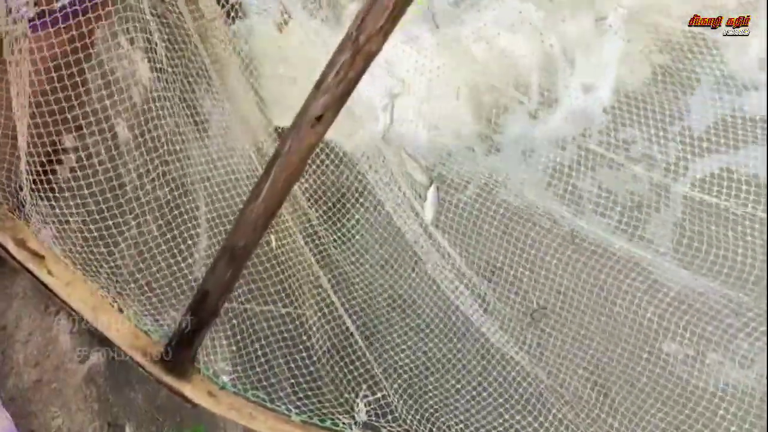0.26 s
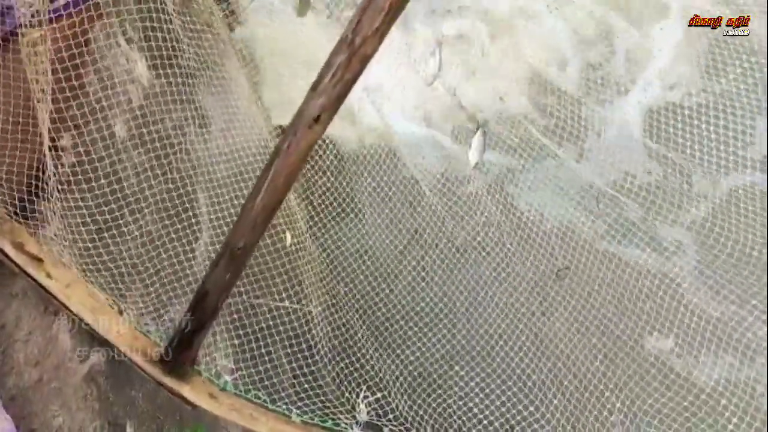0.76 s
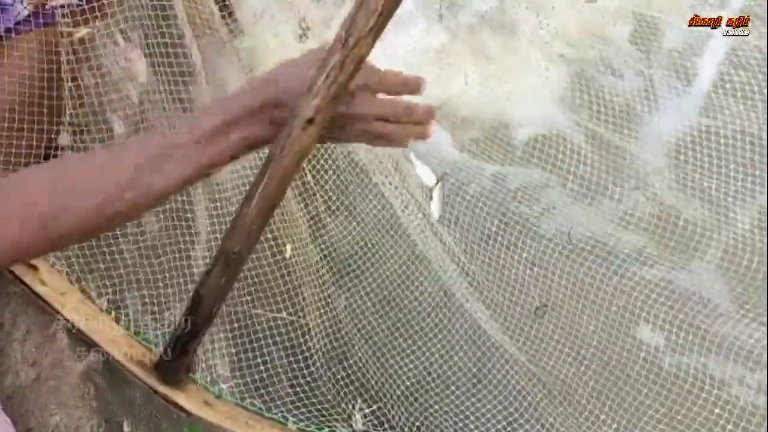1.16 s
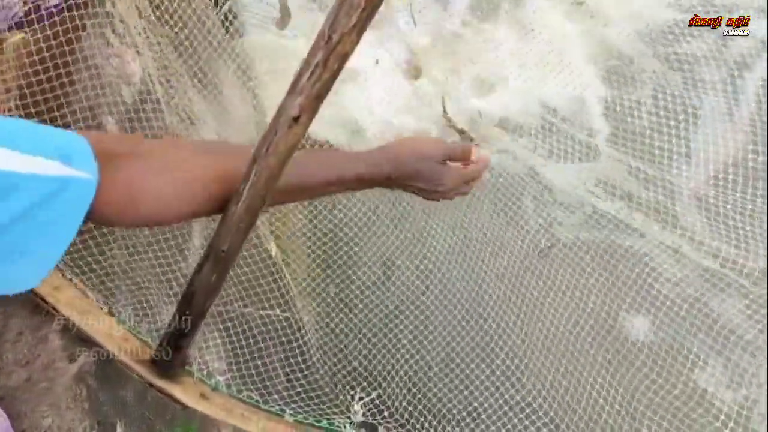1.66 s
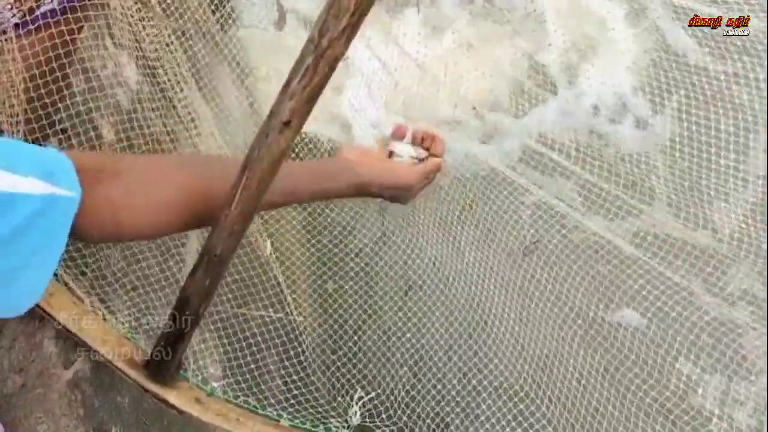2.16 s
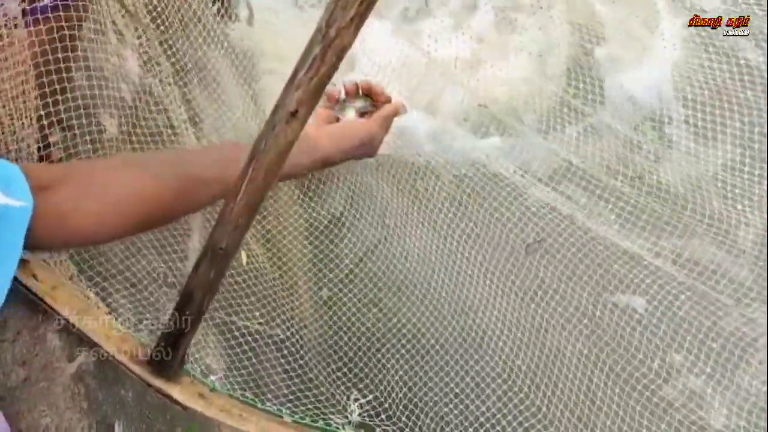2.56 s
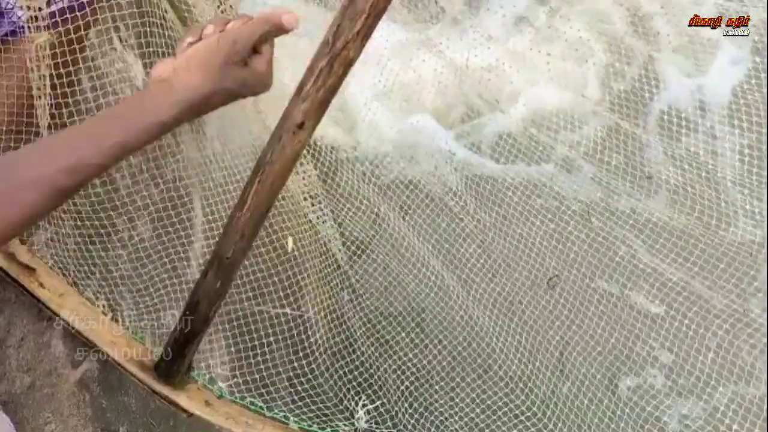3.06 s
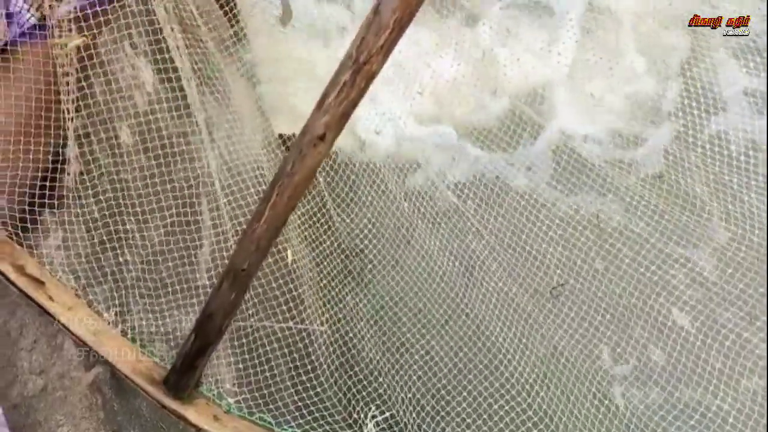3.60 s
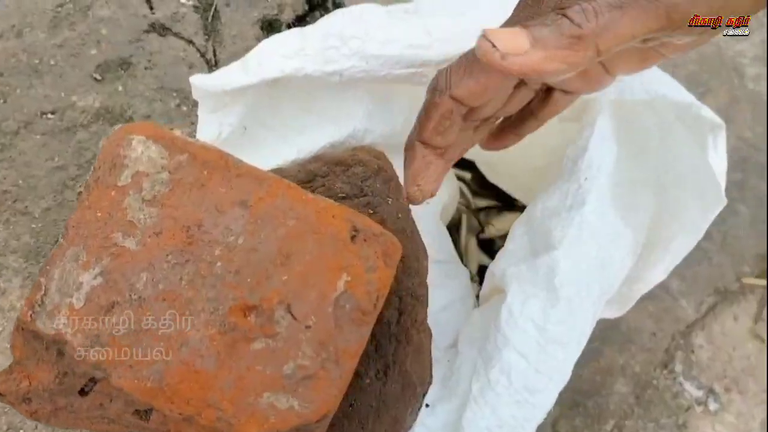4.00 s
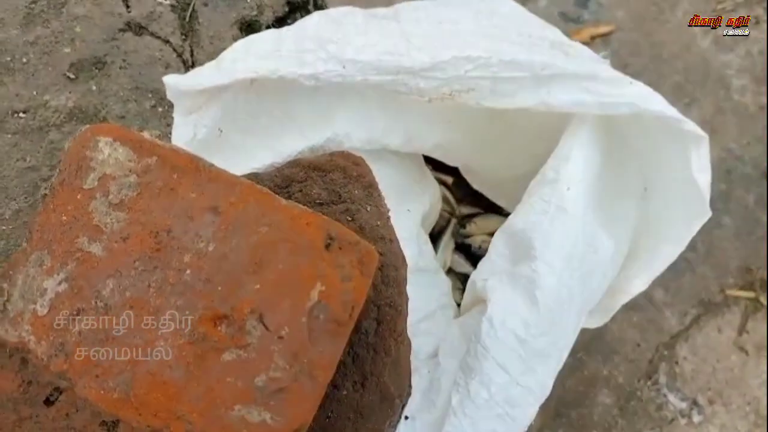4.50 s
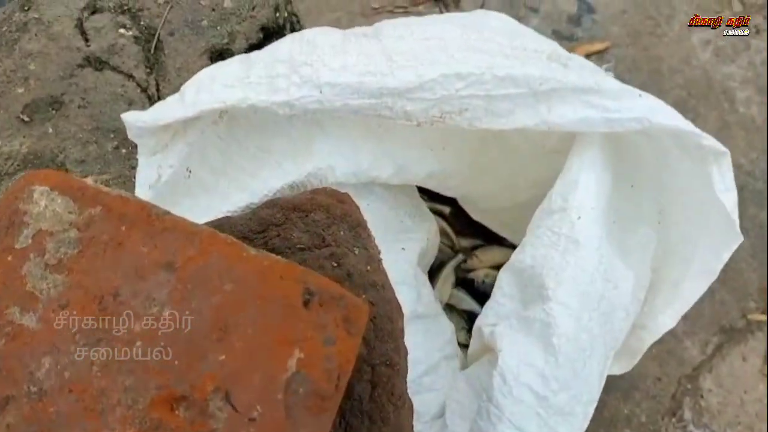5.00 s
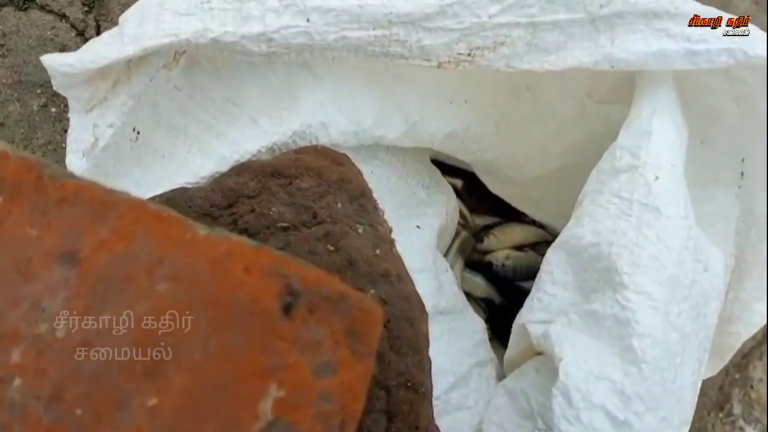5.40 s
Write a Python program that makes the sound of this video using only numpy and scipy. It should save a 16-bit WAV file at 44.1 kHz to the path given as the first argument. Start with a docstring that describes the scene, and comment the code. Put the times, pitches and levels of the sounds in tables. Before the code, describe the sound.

From the start, water gushes out of a sluice into a channel, close and outdoors: a steady foaming rush with fizzing spray on top and single bubbles plopping through it. A faint, thin whistle sounds at about 0.2 seconds and a drop ticks at 0.5. Wind bumps the microphone lightly around 0.8 seconds and rumbles again between 2.5 and 3.5. At 3.5 seconds everything cuts to silence. At about 4.1 the water returns as a smoother wash heard from the bank, then sinks noticeably over the next second as the microphone turns away. Between 4.3 and 4.9 it briefly sounds hollow, with two quick splashes and a few faint high whistled notes, perhaps a far bird. From 4.4 seconds until the end, near 5.6, gusts buffet the microphone with uneven low thumps over the softer water.

```python
"""A foaming rush, close by: water gushes from a sluice into a channel, full of bursting bubbles.
Each bubble rings as an air spring loaded by water; countless tiny bursts merge into noise.
After a short silence the microphone is on the bank and turns away, so the rush and its spray sink,
while eddies of wind buffet it with low thumps and the water briefly sounds hollow.
Twice a faint thin whistle rises over the water."""
import sys
import numpy as np
from scipy import signal
from scipy.fft import rfft, irfft
from scipy.io import wavfile
from scipy.ndimage import uniform_filter1d

SR = 44100
rng = np.random.default_rng(int(sys.argv[2]) if len(sys.argv) > 2 else 0)


def output_pcm(signal):
    """Save a mono or channel-first signal as 16-bit PCM at the path in sys.argv[1].

    Samples are clipped to [-1, 1] before scaling.
    """
    pcm = np.clip(np.atleast_2d(signal).T, -1, 1) * 32767
    wavfile.write(sys.argv[1], SR, np.round(pcm).astype(np.int16))


N = 249165
TIME = np.arange(N) / SR
PAUSE_START_S, BANK_START_S = 3.516, 4.134  # the silence between the outflow and the bank


def rush(surge_db=0.57, surge_hz=5, sink_db=8.5, splash_share=.25):
    """Turbulence traps air: foam and ringing bubbles add to a roar, a smoother wash from the bank."""
    # spectra beside the outflow and from the bank: f/Hz, relative level/dB
    near_spectrum = [(60, -30.5), (110, -3), (190, -3.5), (330, -4), (450, 0.5), (620, -2.5), (800, 0),
                     (1130, 1), (1600, -4.5), (1780, -4), (2060, -9.5), (2640, -6.5), (3220, -9.5),
                     (4000, -7), (5200, -47), (8800, -110)]
    bank_spectrum = [(60, -31), (100, -3), (150, 1), (250, 2.5), (320, -5), (450, 1), (560, -0.5),
                     (700, -6), (850, -2), (1100, -5.5), (1300, -9.5), (1800, -9.5), (2200, -15.5),
                     (2600, -10.5), (3300, -13.5), (4000, -10), (5200, -53), (8800, -110)]
    gurgle = swarm(216.3, 1892, per_s=500, spread_db=3.5, cycles=2.2)
    near = foam(patchy_db=1.5, flicker_db=0.7) + amp(-16) * gurgle
    bank = foam(patchy_db=0.95, flicker_db=1.0) + amp(-22) * gurgle
    near = amp(-30) * colour(near, near_spectrum)
    bank = amp(-28.2 - sink_db * turned()) * colour(bank, bank_spectrum)
    surge = amp(splash_share * splash_db() + surge_db * drift(surge_hz))
    return np.where(TIME < BANK_START_S, near, bank) * surge


def spray(surge_db=0.5, surge_hz=8, sink_db=9):
    """Resonant frequency rises as size falls: droplets and the smallest bubbles fizz above the rush."""
    # spectra beside the outflow and from the bank: f/Hz, relative level/dB
    near_spectrum = [(3000, -22.5), (3800, 0.5), (4150, 0.5), (4450, -2.5), (5000, -1.5), (5850, 0),
                     (6500, -6.5), (7200, -6), (8200, -17), (9200, -34), (11000, -30.5), (11900, -24),
                     (13000, -36.5), (15400, -25.5)]
    bank_spectrum = [(3000, -29), (3800, 4), (4200, -1), (4600, -2.5), (5850, -3.5), (6500, -6),
                     (7200, -4.5), (8200, -15.5), (9300, -35), (10200, -26.5), (11900, -26), (13000, -32),
                     (15400, -25)]
    fizz = foam(patchy_db=0.5, flicker_db=.8)
    fizz += amp(-11) * swarm(3500, 14000, per_s=700, spread_db=4.5, cycles=3.5, count=20)
    near = amp(-44.2) * colour(fizz, near_spectrum)
    bank = amp(-44 - sink_db * turned()) * colour(fizz, bank_spectrum)
    surge = amp(splash_db() + surge_db * drift(surge_hz))
    return np.where(TIME < BANK_START_S, near, bank) * surge


def foam(patchy_db, flicker_db):
    """Incoherent addition: countless tiny bursts merge into noise, patchy in frequency and time."""
    cells = signal.stft(rng.standard_normal(N), nperseg=256, noverlap=192)[2]
    patches = uniform_filter1d(rng.standard_normal(cells.shape), size=4, axis=0)
    patches = unit(uniform_filter1d(patches, size=12, axis=1))
    noise = signal.istft(cells * amp(patchy_db * patches), nperseg=256, noverlap=192)[1][:N]
    return unit(noise * amp(flicker_db * drift(45)))


def swarm(lo_hz, hi_hz, per_s, spread_db, cycles, count=40):
    """Shot noise: bubbles of many sizes are born at random; small ones tend to ring for more cycles."""
    out = np.zeros(N)
    for hz in np.geomspace(lo_hz, hi_hz, count):
        born = rng.random(N) < per_s / count / SR
        strength = amp(spread_db * np.minimum(rng.exponential(1, N), 3.5)) * rng.choice([-1, 1], N)
        ring = bubble(hz, cycles * np.sqrt(hz / 1000) * rng.uniform(0.53, 1.66))
        out += np.sqrt(hz) * unit(signal.oaconvolve(born * strength, ring)[:N])
    return unit(out)


def bubble(hz, cycles, rise=0.0095):
    """Damped resonance of an air pocket: it peaks after `cycles`, its pitch rising near the surface."""
    peak_s = cycles / hz
    age = np.arange(int(6 * peak_s * SR) + 2) / (peak_s * SR)
    envelope = age ** 2 * np.exp(2 * (1 - age))
    return envelope * np.sin(2 * np.pi * cycles * (age + rise * age ** 2 / 2))


def plops(echo_s=0.0059, echo_db=-9):
    """Single bubbles ring out in free oscillation, each with a reflection from the channel wall."""
    # bubbles: t/s, f/Hz, peak level/dB
    bubbles = [(.138, 3430, -26), (.203, 1088, -13.5), (.287, 805, -21.5), (.350, 1410, -24),
               (.524, 4060, -30.5), (1.115, 304, -22), (1.112, 1103, -20.5), (1.372, 1124, -19.5),
               (1.53, 466, -24), (1.593, 1300, -23), (1.656, 1720, -22.5), (1.979, 1820, -24.5),
               (2.078, 755, -23.5), (2.172, 1750, -26), (2.301, 765, -22.5), (2.305, 262, -22),
               (3.077, 1440, -22.5), (4.279, 3500, -32), (4.867, 1740, -26.5)]
    out = np.zeros(N)
    for s, hz, db in bubbles:
        ring = amp(db) * bubble(hz, cycles=3.0 * (hz / 1000) ** .85)
        add(out, s, ring)
        add(out, s + echo_s, amp(echo_db) * ring)
    return out


def drops():
    """Drops strike the water close by; heavy damping leaves only a dry tick."""
    # impacts: t/s, f/Hz, peak level/dB
    impacts = [(0.492, 1125, -17), (.503, 5930, -24)]
    out = np.zeros(N)
    for s, hz, db in impacts:
        add(out, s, amp(db) * bubble(hz, cycles=1.2))
    return out


def splash_db():
    """Amplitude modulation, in dB: each splash throws up extra spray, which swells and falls."""
    # splashes: peak t/s, duration/s, rise in level/dB
    splashes = [(0.523, .06, 0.8), (3.25, .35, 0.6), (4.594, 0.074, 5), (4.75, 0.14, 4.5), (5.52, 0.24, 1)]
    return sum(db * bell(s, length) for s, length, db in splashes)


def turned():
    """Directivity: how far the microphone has turned from the water, 0 to 1, easing to rest."""
    start_s, length_s = 4.234, 1.0
    return 1 - (1 - np.clip((TIME - start_s) / length_s, 0, 1)) ** 2


def swirl(water, shortest_s=0.000857, longest_s=.006, wander=.03, rest=0.09, count=20):
    """Comb filtering: close reflections with wandering delays swell, and the water turns hollow."""
    highpass = signal.butter(2, 700, "high", fs=SR, output="sos")  # long waves pass small things by
    bounced = signal.sosfilt(highpass, water)
    sway = drift(2.97)  # one movement stretches all the paths together
    echoes = np.zeros(N)
    for base_s in np.linspace(shortest_s, longest_s, count):
        delay_s = base_s * rng.uniform(0.99, 1.0) * (1 + wander * (sway + .5 * drift(4.7)))
        echoes += rng.choice([-1, 1]) * np.interp(TIME - delay_s, TIME, bounced)
    strength = rest + (1 - rest) * plateau(4.33, attack=0.08, hold=.35, release=0.11)
    return (water + strength * echoes / np.sqrt(count)) / np.sqrt(1 + strength ** 2)


def culvert(hz=256, width_hz=22, db=-43):
    """Cavity resonance: the hollow of the sluice booms on one low mode, heard only beside it."""
    b, a = signal.iirpeak(hz, hz / width_hz, fs=SR)
    boom = unit(signal.lfilter(b, a, rng.standard_normal(N)))
    return amp(db) * boom * (TIME < BANK_START_S)


def wind(lumpy_db=1.0, near_breeze_db=-55, bank_breeze_db=-51):
    """Turbulent pressure on the microphone makes a lumpy rumble: a light breeze with gusts on top."""
    # rumble spectrum: f/Hz, relative level/dB
    spectrum = [(15, -6), (35, -10), (70, 4), (110, 1.5), (200, -7.5), (400, -23.5), (900, -56.5),
                (2000, -91.5)]
    # gusts: peak t/s, duration/s, level/dB
    gusts = [(0.507, 0.17, -47), (0.77, 0.19, -41.5), (2.577, 0.19, -40.5), (3.135, 0.082, -33.5),
             (3.336, 0.062, -38), (3.45, 0.073, -33), (4.17, .1, -42), (4.577, 0.077, -33.5),
             (4.873, 0.052, -41), (5.067, 0.15, -40.5), (5.26, 0.055, -34.5), (5.422, 0.083, -33),
             (5.63, .08, -38)]
    rumble = colour(rng.standard_normal(N), spectrum) * amp(lumpy_db * drift(20))
    breeze = amp(np.where(TIME < BANK_START_S, near_breeze_db, bank_breeze_db))
    return unit(rumble) * (breeze + sum(amp(db) * bell(s, length) for s, length, db in gusts))


def buffets(edge_s=.004, squash=0.69, housing_hz=149, width_hz=24):
    """Forced vibration: each eddy shakes the microphone for a few uneven cycles; its housing rings on."""
    # eddies: t/s, duration/s, relative level/dB, f/Hz
    eddies = [(0.723, 0.018, -37, 149), (.803, 0.01, -26.5, 139), (3.112, 0.08, -37.5, 203),
              (3.419, 0.058, -34.5, 205), (4.377, 0.032, -23.5, 188), (4.559, 0.034, -19.5, 212),
              (4.584, 0.041, -21.5, 150), (4.742, 0.019, -34, 170), (4.853, 0.044, -24.5, 173),
              (4.965, 0.017, -30, 160), (5.063, 0.016, -29, 168), (5.19, 0.019, -32.5, 180),
              (5.411, 0.053, -24, 170), (5.593, 0.013, -24, 139)]
    # spectrum of a thump: multiple of the eddy's f, relative level/dB
    thump_shape = [(.15, -34), (.45, -14), (.8, -1), (1.2, 0.5), (2, -5.5), (3, -17.5), (5, -32),
                   (12, -70.5)]
    thumps = np.zeros(N)
    t = TIME[:8192] - .02  # starts ahead of the onset to hold the soft edge
    for s, length, db, hz in eddies:
        spectrum = [(ratio * hz, level) for ratio, level in thump_shape]
        pressure = np.tanh(squash * colour(rng.standard_normal(len(t)), spectrum))
        gate = (1 + np.tanh(t / edge_s)) * (1 + np.tanh((length - t) / edge_s))
        thump = unit(pressure * gate) * np.sqrt(length * SR / len(t))  # rms near 1 while it lasts
        add(thumps, s + t[0], amp(db) * thump)
    b, a = signal.iirpeak(housing_hz, housing_hz / width_hz, fs=SR)
    return amp(-3) * (thumps + signal.lfilter(b, a, thumps))


def whistle(width_hz=55, edge_s=0.027):
    """Thin gliding notes, perhaps a far bird; random modulation widens each into a rough, narrow band."""
    # notes: t/s, duration/s, starting f/Hz, glide/Hz, level/dB
    notes = [(.19, 0.13, 4270, 128, -43), (4.283, 0.093, 4280, -30, -42), (4.433, 0.16, 4300, 12, -42),
             (4.545, 0.13, 4380, 216, -46.5), (4.675, .125, 4510, -280, -47)]
    tone = np.zeros(N, complex)
    for s, length, hz, glide_hz, db in notes:
        pitch_hz = hz + glide_hz * np.clip((TIME - s) / length, 0, 1)
        phase = 2 * np.pi * np.cumsum(pitch_hz) / SR
        tone += amp(db) * plateau(s, edge_s, length - 2 * edge_s, edge_s) * np.exp(1j * phase)
    return drift(width_hz) * tone.real + drift(width_hz) * tone.imag


def hiss(db=-68.5):
    """Self-noise of the microphone: a faint, steady hiss."""
    # hiss spectrum: f/Hz, relative level/dB
    spectrum = [(3000, -29.5), (8000, -9), (9500, -2.5), (11000, -5.5), (11900, 2), (13000, -3),
                (14200, -2.5), (15400, 8.5)]
    return amp(db) * colour(rng.standard_normal(N), spectrum)


def colour(x, spectrum):
    """Spectral shaping by rows of f/Hz, relative level/dB; the result has rms 1."""
    hz, db = np.transpose(spectrum)
    f = np.fft.rfftfreq(len(x), 1 / SR)
    gain = amp(np.interp(np.log(f + 1), np.log(hz), db))
    return unit(irfft(rfft(x) * gain, len(x)))


def drift(hz):
    """Low-pass noise of rms 1: a random fluctuation with its cutoff at hz."""
    f = np.fft.rfftfreq(N, 1 / SR)
    return unit(irfft(rfft(rng.standard_normal(N)) / (1 + (f / hz) ** 4), N))


def bell(s, length):
    """Bell-shaped envelope: 1 at time s, and above one half for the given length."""
    return .5 ** ((2 * (TIME - s) / length) ** 2)


def plateau(s, attack, hold, release):
    """Trapezoidal envelope: rises from 0 at time s, holds at 1 and falls back."""
    end = s + attack + hold + release
    return np.clip(np.minimum((TIME - s) / attack, (end - TIME) / release), 0, 1)


def amp(db):
    """Level in decibels to amplitude ratio."""
    return 10 ** (np.asarray(db) / 20)


def unit(x):
    """Normalisation to rms 1."""
    return x / np.sqrt(np.mean(x ** 2) + 1e-20)


def add(mix, s, sound):
    """Superposes a sound on the mix at time s."""
    part = mix[max(round(s * SR), 0):][:len(sound)]
    part += sound[:len(part)]


def scene():
    """Superposition of water, wind, whistle and hiss at one microphone."""
    water = swirl(rush() + spray()) + culvert() + plops() + drops()
    return (water + wind() + buffets() + whistle() + hiss())[None]


def record(dry, cutoff_hz=15550):
    """Gating and band limiting: the sound drops out for the pause and loses its highest treble."""
    live = (TIME < PAUSE_START_S) | (TIME > BANK_START_S)
    gate = uniform_filter1d(live.astype(float), size=40)
    lowpass = signal.firwin(511, cutoff_hz, window=("kaiser", 9), fs=SR)
    return signal.oaconvolve(dry * gate, lowpass[None], "same")


dry = scene()
out = record(dry)
output_pcm(out)
```